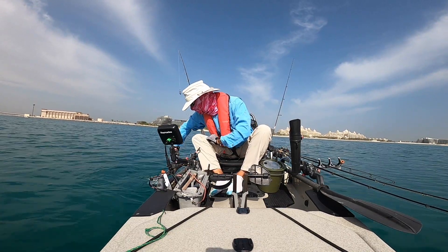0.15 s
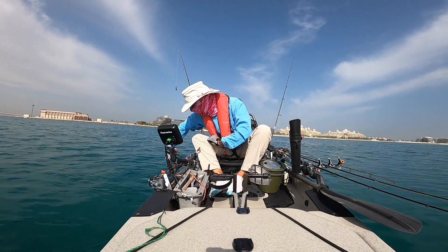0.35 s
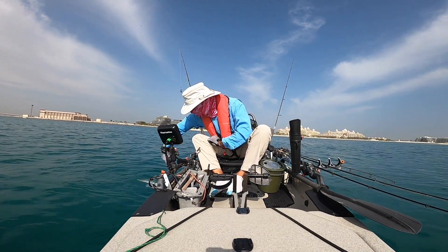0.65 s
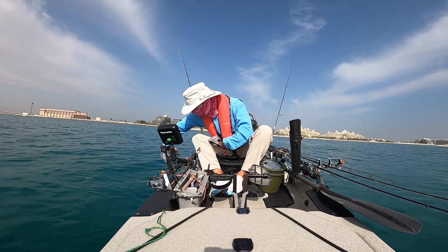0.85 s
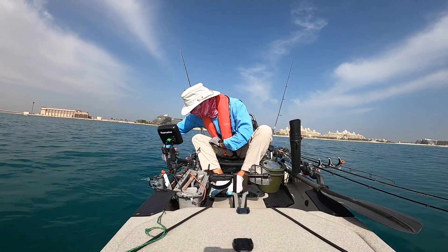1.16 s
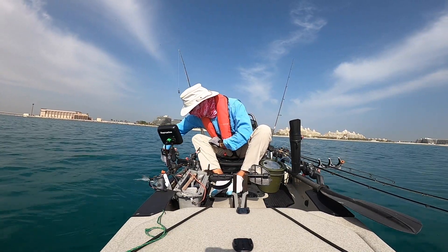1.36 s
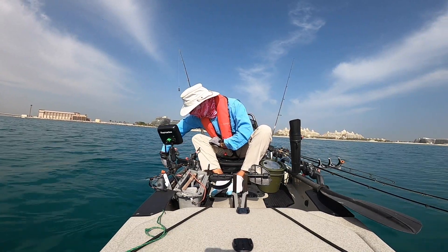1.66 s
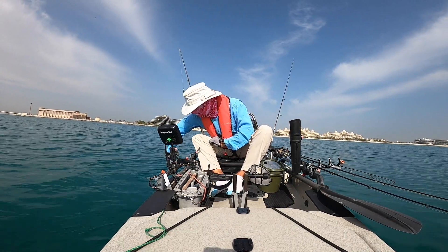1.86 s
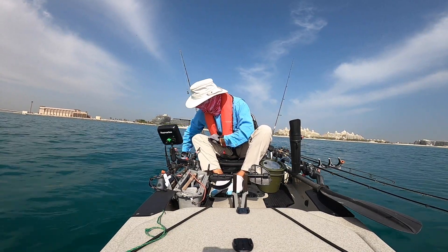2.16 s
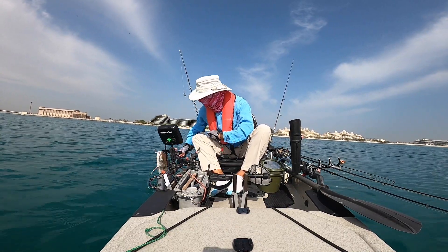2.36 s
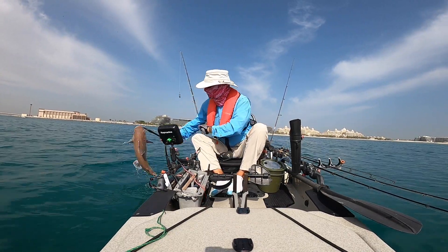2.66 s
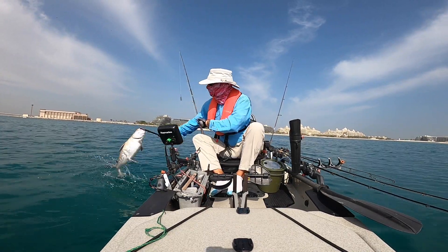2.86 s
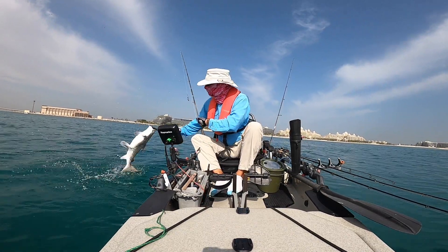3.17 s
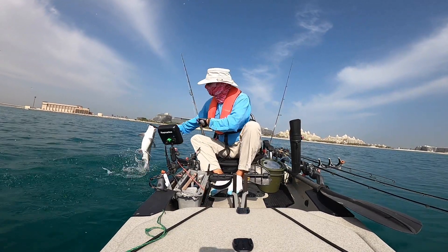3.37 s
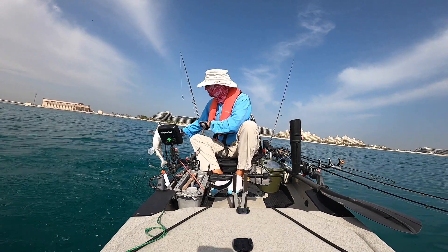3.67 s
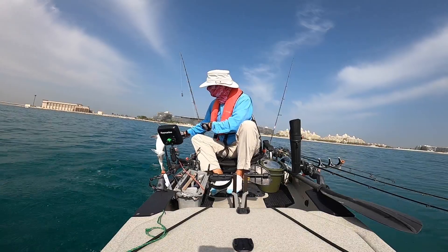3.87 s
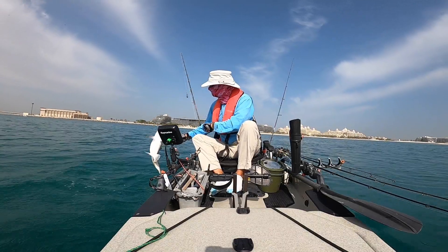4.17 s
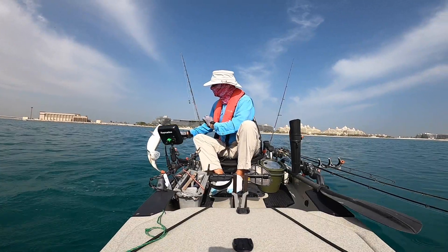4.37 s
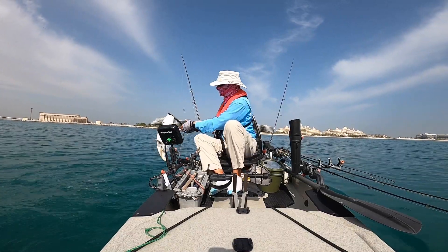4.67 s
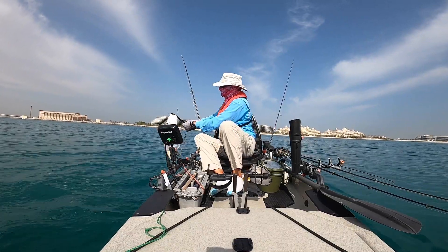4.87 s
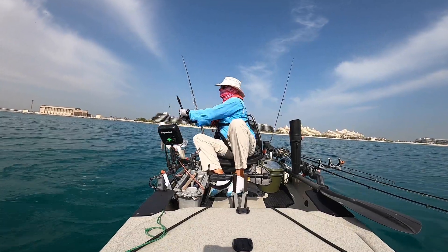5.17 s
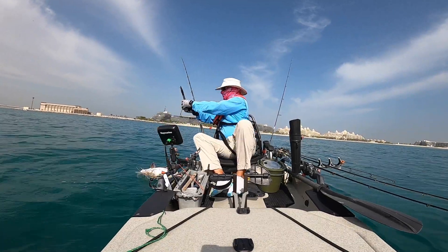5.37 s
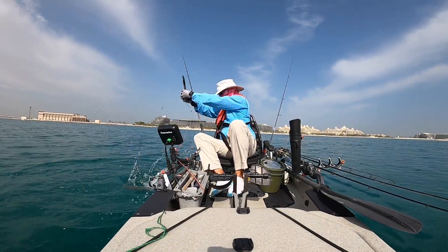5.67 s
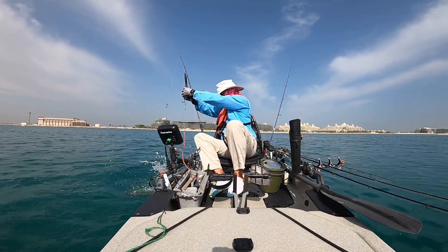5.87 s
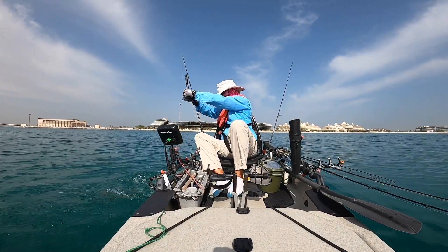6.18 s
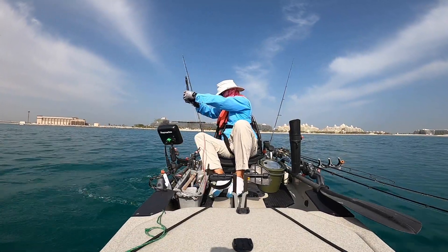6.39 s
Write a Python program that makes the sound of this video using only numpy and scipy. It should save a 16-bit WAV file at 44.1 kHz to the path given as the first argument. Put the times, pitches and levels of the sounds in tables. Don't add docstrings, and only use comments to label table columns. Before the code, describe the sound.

Outdoors on open water, close microphone on a plastic kayak. Low lumpy wind rumble covers a faint steady electric pump hum and distant wash, with a few tiny tackle ticks. A gust thumps the right side, then a fish thrashes with deep gulps, spray and slaps on the hull. Drips thin out into a quiet pause before the fish falls back with a sharp crack, a loud gulp and bubbling.

```python
import sys
import numpy as np
from scipy import signal
from scipy.fft import rfft, irfft, next_fast_len
from scipy.io import wavfile
from scipy.ndimage import uniform_filter1d

SR = 44100
rng = np.random.default_rng(int(sys.argv[2]) if len(sys.argv) > 2 else 0)


def convert_level_to_amplitude(level_db):
    exponent = np.asarray(level_db, float) / 20
    return 10 ** exponent


def persist_wave(psi):
    counts = np.round(np.clip(psi, -1, 1) * 32767).astype(np.int16)
    wavfile.write(sys.argv[1], SR, np.atleast_2d(counts).T)


N = 287867

# start_s, hold_s, release_s (for 20 dB), level_db, fine_spray_db (above level)
THROWS = [(2.267, 0.077, -16.04, -62, -21), (2.385, .08, -1.63, -54, -19), (2.49, .34, -0.73, -48.5, -20),
          (2.858, 0.008, -0.03, -40.5, -7.5), (2.882, 0.0074, 1.32, -52.5, -3),
          (3.007, 0.0131, 0.25, -42.5, -21), (3.084, 0.0067, 0.8069, -40.5, -11),
          (3.272, 0.0047, 0.0921, -38.5, -23.5), (3.326, 0.012, 0.45, -39.5, -9),
          (3.497, 0.051, 0.4377, -46, -29.5), (4.41, .06, .08, -56, -22), (5.245, 0.39, .05, -59, -13.5),
          (5.319, 0.0184, 0.15, -49.5, -17.5), (5.447, .06, 5.42, -63, -21), (5.548, 0.015, 0.1, -41, -12),
          (5.564, 0.075, 0.37, -45.5, -15.5), (5.651, 0.124, 0.08, -38, -16),
          (5.747, 0.0173, 0.1335, -34, -21), (5.801, 0.257, 0.5435, -39, -17.5),
          (6.149, .02, 0.5, -38, -14.5)]
# start_s, hold_s, release_s (for 20 dB), level_db
GURGLES = [
    (2.38, 0.46, 0.03, -46.5),
    (2.885, 0.0041, 0.0365, -37.5),
    (3.035, 0.0057, -0.04, -41),
    (3.095, 0.011, 0.0577, -37),
    (3.3, 0.266, 0.4, -46),
    (4.41, 0.0226, -0.64, -54),
    (5.23, 0.34, 1.6, -54),
    (5.56, .14, 0.14, -43),
    (5.74, 0.024, -0.0058, -27.5),
    (5.8, 0.321, 0.74, -39.5),
]
ATTACK_S = 0.0238
# pitch_hz, level_db (per Hz)
FIZZ_COLOUR = [(3000, 4), (4500, -4), (6000, -10), (8000, -12), (10300, -14), (11500, -28), (12800, -24),
               (15400, -34), (16400, -50)]
# start_s, length_s, hiss_db, body_db
SHEETS = [(2.658, 0.0314, -55, -2), (2.844, 0.0563, -47.5, 6), (3.073, 0.067, -45, 5),
          (3.298, 0.042, -47.5, 0.5), (3.54, 0.019, -56.5, 13), (4.415, 0.045, -67, 8),
          (5.297, 0.07, -52.5, -0.5), (.004, .028, -74, 19), (5.469, .012, -62, 8), (5.515, 0.0284, -53, 9),
          (5.651, 0.0344, -56, 13), (5.726, 0.0377, -53.5, 12.5), (6.135, 0.039, -45.5, -16)]
# start_s, level_db, pitch_hz
AIR_POCKETS = [
    [(2.42, -48, 160.4), (2.476, -44.5, 182.9), (2.518, -17.5, 171.4), (2.68, -56.5, 182.7)],
    [(5.6, -58.5, 171.1), (5.676, -17, 285.8), (5.768, -31, 228), (5.85, -47, 169)],
]
# start_s, level_db, pitch_hz, t60_s
BUBBLES = [(0.115, -45, 499, 0.1), (1.232, -46, 2272, .035), (2.388, -40, 930, 0.05),
           (2.478, -40, 890, .04), (2.508, -38, 620, .07), (2.562, -26, 170, .06), (2.62, -32, 275, .08),
           (2.625, -40, 650, .04), (3.4, -38, 1120, .04), (3.552, -32, 1000, .02), (3.602, -36, 1500, .025),
           (3.747, -40, 1200, .03), (5.663, -31, 420, .04), (5.72, -30, 450, .03), (6.44, -36, 1400, .025),
           (2.499, -27, 328, 0.0243), (2.7, -32, 280, 0.04), (2.826, -27.5, 341, 0.0247),
           (3.033, -21.5, 1249, 0.0488), (3.295, -34.5, 1239, 0.0435), (3.83, -38, 1100, 0.03),
           (5.235, -38, 713.6, 0.07), (5.437, -28, 330, 0.02), (5.5325, -11, 400, 0.015),
           (5.533, -13, 270, .02), (2.582, -36, 1190, .03), (2.6615, -37, 1030, .03),
           (2.698, -38, 1010, .03), (2.338, -46, 2250, .02), (2.38, -44, 2300, .03),
           (4.435, -45, 2300, .02), (4.448, -45, 1600, .02), (5.992, -31, 996, .03),
           (5.744, -18, 295, 0.0574), (5.855, -34.5, 794, 0.046), (5.914, -26, 729, 0.0243),
           (6.001, -30.5, 583.2, 0.068), (6.019, -29.5, 708.6, 0.0596), (6.189, -36, 1004, 0.039),
           (6.313, -36, 546, 0.09), (6.408, -32.5, 1250, 0.0384)]
# start_s, level_db, pitch_hz
SMALL_DROPS = [(2.36, -37.5, 2257), (2.4494, -40.5, 1650), (2.5037, -31, 2376), (2.577, -38.5, 1920),
               (2.661, -38.5, 2250), (2.71, -35.5, 1970), (2.8578, -17, 1900), (2.913, -35, 2420),
               (3.0054, -31.5, 1814), (3.018, -26.5, 2285), (3.097, -23, 2425), (3.1218, -18, 2022),
               (3.2035, -39, 1880), (3.2522, -33, 1870), (3.281, -22, 2170), (3.3811, -30.5, 2630),
               (3.486, -29.5, 3000), (3.539, -26, 1884), (3.5555, -26, 2360), (3.6099, -29.5, 2297),
               (3.6243, -32, 2490), (3.6554, -30, 2690), (3.683, -32, 2643),
               (3.963, -39.5, 3165), (4.1461, -43.5, 3320), (4.4076, -34.5, 3243),
               (5.5328, -17, 2552), (5.6303, -29, 2786), (5.6552, -23.5, 2588), (5.6728, -25, 3465),
              (5.6935, -25, 1506), (5.7406, -14.5, 2012), (5.76, -18, 2787), (5.89, -30.5, 2330),
              (6.0235, -28.5, 2606), (6.0661, -29.5, 2150), (6.168, -26, 1765), (6.18, -26, 2635),
              (6.2364, -22.5, 2360), (6.3494, -34, 2140), (6.489, -41, 2286)]
DROP_T60_S = 0.01225
# start_s, level_db, body_db (above level)
SLAPS = [(0.116, -34, 11), (2.598, -26, 12.5), (2.848, -25.5, 4.5), (2.8772, -22.5, -11),
         (3.019, -26.5, 4.5), (3.0747, -27.5, -6.5), (3.1021, -18, 10.5), (3.2971, -23.5, -10),
         (3.3187, -16.5, -11.5), (3.653, -29, 4), (3.7271, -28.5, 10.5), (4.0369, -36, -9.5),
         (4.075, -37, 4.5), (4.408, -38.5, 14), (4.4765, -38, 14), (5.2357, -42, 8), (5.5241, -30, 13),
         (5.533, -13, 2), (6.153, -25.5, -6.5), (6.314, -28, -6), (6.418, -29, 5), (6.4345, -28, 0)]
# start_s, level_db, body_db (above level)
TICKS = [(0.2971, -50, 10), (0.6045, -57, 18), (0.7178, -52, 6), (1.088, -55, 8), (1.1724, -54, 9),
         (1.5948, -58, 18), (1.9215, -51, 6), (2.2844, -50, 10), (4.557, -45, 9), (4.7694, -43, 10)]
SNAP_S, SNAP_DB = 5.5246, -10
# start_s, length_s, level_db, top_hz
KNOCKS = [(2.378, .02, -47, 1300), (3.432, .006, -45, 2500), (3.465, .012, -42, 1400),
          (5.231, .009, -41, 3000), (5.433, .011, -38, 800), (5.5255, .006, -32, 2800),
          (5.531, .005, -18.5, 2900), (5.537, .005, -38, 3000), (5.738, .008, -29, 2300),
          (5.755, .008, -32, 1800), (6.24, .006, -38, 3000)]
# start_s, level_db, pitch_hz
SPECKS = [(0.0094, -33, 3920), (0.0174, -42, 3740), (0.1156, -33, 3330), (0.4683, -59, 4510),
          (2.355, -49, 3200), (2.4254, -48, 3800), (2.5032, -35, 3320), (2.5601, -45, 3740),
          (2.578, -32, 3950), (2.6339, -40, 3930), (2.6539, -39, 3300), (2.7018, -41, 3350),
          (2.7536, -46, 3370), (2.8659, -26, 4140), (2.8744, -21, 4670), (2.9407, -46, 6230),
          (2.9662, -44, 4420), (3.032, -34, 3220), (3.0854, -25, 3260), (3.1872, -41, 3200),
          (3.2031, -34, 3990), (3.3474, -33, 3200), (3.3662, -33, 3300), (3.4106, -31, 3700),
          (3.4341, -36, 4430), (3.458, -37, 3240), (3.485, -34, 3200), (3.5109, -39, 3350),
          (3.5508, -30, 3610), (3.6052, -38, 3570), (3.6334, -38, 3220), (3.682, -33, 3290),
          (3.7708, -42, 3420), (3.8127, -47, 3260), (3.8631, -47, 4200), (3.8846, -46, 3750),
          (3.937, -49, 3360), (4.0154, -45, 4440), (4.0951, -50, 3200), (5.659, -26, 3450),
          (5.8661, -34, 4480), (5.888, -31, 3420), (6.0137, -31, 3240), (6.0691, -35, 3320),
          (6.1275, -33, 3370), (6.1509, -24, 4710), (6.1674, -28, 3210), (6.2387, -28, 3380),
          (6.2996, -32, 3200), (6.349, -36, 3430), (6.3894, -40, 3330)]
SPECK_DB, SPECK_T60_S, SPECK_WIDTH = -3, .018, 1.16
# start_s, turns_per_s
SHAFT = [(0, 43.43), (2.3, 43.43), (4.2, 43.48), (6.53, 43.48)]
# pitch_hz, level_db
HUM_COLOUR = [(350, -4), (1000, -6), (1550, -9), (1750, -18), (2300, -13), (3000, -19), (3500, -24),
              (3750, -29), (4400, -28), (4800, -29), (5200, -37)]
HUM_DB = -67
# pitch_hz, level_db
ORDERS_HEARD = [(565.2, -66), (651.4, -69), (780.6, -73), (1087, -72), (1303, -75), (1610, -78),
                (1653, -79), (2040, -75), (2083, -76), (2390, -82), (2433, -81), (2606, -81), (2735, -82),
                (3386, -88), (3429, -85), (4040, -93), (4430, -88), (4473, -92), (4689, -89), (694.4, -66),
                (737.5, -67), (866.7, -71), (952.8, -68), (1044, -73), (1130, -66), (1174, -65),
                (1217, -67), (1260, -73), (1432, -70), (1911, -75), (1954, -74), (1997, -73), (2169, -74),
                (2261, -76), (4517, -83), (4560, -81)]
# shaft_multiple, level_db
LATE_ORDERS = [(55, -80), (102, -79)]
LATE_S, LATE_RUMBLE_DB = 2.5, 3.5
# start_s, level_db
WIND = [(0.0, -29.5), (0.49, -31), (1.02, -31.5), (1.44, -30.5), (1.91, -26.5), (2.05, -28.5), (2.11, -23),
        (2.24, -30.5), (2.47, -27.5), (2.62, -26.5), (2.74, -43.5), (3.14, -36), (4.75, -36), (4.85, -32),
        (4.93, -37.5), (5.5, -33), (5.74, -35), (6.53, -35)]
# pitch_hz, level_db (per Hz)
RUMBLE_COLOUR = [(8.8, -29), (15, -3), (43, -5), (63, -2), (162, -12.5), (210, -11), (295, -20), (324, -27),
                 (427, -30), (462, -31.5), (600, -35.5), (780, -68), (1320, -120)]
# pitch_hz, level_db
UPPER_COLOUR = [(90, -7.5), (150, 3.0), (230, -3.5), (300, -9.0), (450, -20.5), (800, -38), (1600, -120)]
UPPER_DB, UPPER_FOLLOW, CALM_DB = -45, 0.13, -34.5
# start_s, left_over_right_db
LEAN = [(0.0, -2.5), (0.28, -9), (0.37, 0), (1.65, -0.5), (1.771, -13), (2.149, -6), (2.35, -5.5),
        (2.7, -18.5)]
# start_s, hold_s, release_s (for 20 dB), level_db
GUSTS = [
    (1.62, 0.163, 2.88, -50),
    (1.82, 0.022, 0.02, -37),
    (1.965, 0.0061, -0.234, -26.5),
    (2.055, 0.0302, 0.131, -19),
    (2.13, 0.1015, .03, -24),
]
# pitch_hz, level_db (per Hz)
GUST_COLOUR = [(35, -36.5), (60, -1), (81, 5.5), (271, -5.5), (308, -17), (404, -15), (828, -46),
               (1000, -36.5), (1300, -76.5), (2200, -120)]
# start_s, level_db, pitch_hz
BUFFETS = [(1.758, -21.5, 123.3), (1.839, -24, 156), (1.966, -16, 154.2), (2.054, -26.5, 250.3),
           (2.06, -40, 380), (2.147, -39, 340), (2.17, -44, 400), (2.219, -23, 125.1)]
# pitch_hz, likeness (0-1)
SAME = [(60, 0.695), (150, 1), (380, 0.95), (950, 0.7), (2380, 1), (5980, 0.21), (15000, 0.32)]
# pitch_hz, level_db (per Hz)
SEA_COLOUR = [(180, -19), (300, 1), (490, -4.5), (730, -2), (810, -13), (1170, -9), (1750, -22),
              (2000, -15.5), (3760, -33), (4600, -31), (5100, -36), (8800, -40), (11000, -47), (16000, -79)]
SEA_DB = -55
MIST_DB, MIST_S, DRIP_S, DRIP_DB, EARLIER_DB, EARLIER_S = -11, 0.084, 2.5, -67, -58, 0.25
# start_s, width (0-1)
WIDTH = [
    (0, 0.36),
    (2.3, 0.95),
    (2.45, 0.14),
    (2.75, 0.01),
    (5.9, 0.01),
    (6.2, 0.07),
    (6.53, 0.12),
]


def evened(x):
    return x / np.sqrt(np.mean(x ** 2) + 1e-20)


def read(points, hz):
    f, value = np.transpose(points)
    return np.interp(np.log(hz + 1), np.log(f + 1), value)


def add(mix, s, sound):
    part = mix[max(round(s * SR), 0):][:len(sound)]
    part += sound[:len(part)]


def band(x, lo_hz, hi_hz, order=2):
    return signal.sosfilt(signal.butter(order, [lo_hz, hi_hz], "band", fs=SR, output="sos"), x)


def coloured(x, points):
    size = next_fast_len(N)
    gain = convert_level_to_amplitude(read(points, np.fft.rfftfreq(size, 1 / SR)))
    return irfft(rfft(x, size) * gain, size)[..., :N]


def lumps(seconds):
    size = max(int(seconds * SR), 1)
    return evened(uniform_filter1d(uniform_filter1d(rng.standard_normal(N), size), size))


def pair(points, same):
    size = next_fast_len(N)
    hz = np.fft.rfftfreq(size, 1 / SR)
    a, b = rfft(rng.standard_normal((2, size))) * convert_level_to_amplitude(read(points, hz))
    c = np.clip(same(hz), 0, 1)
    return evened(irfft(np.array([a, c * a + np.sqrt(1 - c ** 2) * b]), size)[:, :N])


def amp_of(rows):
    rows, t = np.array(rows), np.arange(N) / SR
    fade = np.clip(np.minimum(t - rows[0, 0] + .02, rows[-1, 0] + .02 - t) / .02, 0, 1)
    return convert_level_to_amplitude(np.interp(t, rows[:, 0], rows[:, 1])) * fade


def surges(rows, extra_db=0):
    start, hold, release, db = np.transpose(rows)[:4, :, None]
    t = np.arange(0, N / SR + .001, .001)
    rise = np.maximum(start - t, 0) / ATTACK_S
    fall = np.maximum(t - start - abs(hold), 0) / abs(release)
    power = (convert_level_to_amplitude(db + extra_db - 20 * np.minimum(rise + fall, 10)) ** 2).sum(0)
    return np.interp(np.arange(N) / SR, t, np.sqrt(power))


def grains(per_s, lo_hz, hi_hz, cycles, spread_db, count=24):
    when, kind, strength = rng.random((3, N))
    at = np.flatnonzero(when < per_s / SR)
    out = np.zeros(N)
    for k, hz in enumerate(np.geomspace(lo_hz, hi_hz, count)):
        u = np.arange(int(3 * cycles / hz * SR) + 4) / SR * hz
        ring = np.sin(2 * np.pi * u * (1 + 0.0656 * u / cycles))
        shape = ring * np.exp(-2 * u / cycles) * (1 - np.exp(-u / 0.57))
        for i in at[(kind[at] * count).astype(int) == k]:
            gain = convert_level_to_amplitude(spread_db * min(-np.log(strength[i] + 1e-9), 4))
            add(out, i / SR, gain * shape / np.sqrt(len(u)))
    return evened(out)


def hiss():
    landings = convert_level_to_amplitude(5 * np.minimum(rng.exponential(1, N), 3)) * (rng.random(N) < 60 / SR)
    crackle = .8 + evened(signal.lfilter([1], [1, -np.exp(-1 / (.0018 * SR))], landings))
    clumped = crackle * convert_level_to_amplitude(2 * lumps(0.012)) * rng.standard_normal((2, N))
    fine = evened(band(coloured(clumped[0], FIZZ_COLOUR), 4760, 17000))
    return fine, evened(band(clumped[1], 870, 2930))


def splash():
    fine, body = hiss()
    fizz = 0.665 * grains(1200, 1100, 3735, 13.0, 4) + 0.36 * grains(600, 1867, 6040, 14, 3.72) + .38 * body
    ticks = evened(band(coloured(grains(400, 5040, 11840, 6.5, 3.0), FIZZ_COLOUR), 4200, 15500))
    churn = evened(band(rng.standard_normal(N), 420, 1695))
    gurgle = 0.77 * grains(350, 419.45, 1419.2, 10.08, 3.85) + 0.29 * churn
    out = convert_level_to_amplitude(-3.0) * surges(THROWS) * evened(fizz)
    out += convert_level_to_amplitude(-1.0) * surges(GURGLES) * evened(gurgle)
    out += surges(THROWS, np.array(THROWS)[:, 4:]) * evened(.3 * ticks + 1.78 * fine)

    sheet_hiss = evened(band(coloured(rng.standard_normal(N), FIZZ_COLOUR), 4450, 13900))
    even = evened(0.22 * fine + sheet_hiss)
    lower = evened(0.22 * body + evened(band(rng.standard_normal(N), 1600, 3910)))
    for s, seconds, db, body_db in SHEETS:
        at = slice(round(s * SR), round((s + seconds) * SR))
        sheet = even[at] + convert_level_to_amplitude(body_db) * lower[at]
        add(out, s, convert_level_to_amplitude(db) * sheet * signal.windows.tukey(len(sheet), .3))
    return out


def plunge():
    out = np.zeros(N)
    for rows in AIR_POCKETS:
        s, _, hz = np.transpose(rows)
        phase = 2 * np.pi * np.cumsum(np.interp(np.arange(N) / SR, s, hz)) / SR
        wobble = lumps(0.0068) * np.cos(phase) + lumps(0.00241) * np.sin(phase)
        overtone = 0.35 * lumps(0.0077) * np.sin(1.6 * phase)
        out += convert_level_to_amplitude(-5.5) * amp_of(rows) * evened(wobble + 1.12 * np.sin(phase) + overtone)
    return out


def drops():
    out, t = np.zeros(N), np.arange(3000) / SR
    rings = BUBBLES + [(*row, DROP_T60_S) for row in SMALL_DROPS]
    chance = rng.random((len(rings), 2))
    for (s, db, hz, t60), (ratio, late) in zip(rings, chance):
        u = t / max(t60, .003)
        neighbour = (s + 0.004128 * late, hz * (0.745 + 0.6623 * ratio), -9)
        for start, pitch, drop_db in ((s, hz, 3), neighbour):
            ring = np.sin(2 * np.pi * pitch * t * (1 + 0.018 * u))
            add(out, start, convert_level_to_amplitude(db + drop_db - 60 * u) * ring * (1 - np.exp(-t / 0.000466)))
    return out


def slaps():
    out, t = np.zeros(N), np.arange(3000) / SR
    add(out, SNAP_S, convert_level_to_amplitude(SNAP_DB) * np.diff(np.exp(-(t * SR / 2.1 - 4) ** 2)) * 2)
    noise = rng.standard_normal((len(SLAPS + TICKS), 2, 3000))
    for (s, db, body_db), (a, b) in zip(SLAPS + TICKS, noise):
        crack = evened(band(a, 3000, 10500, order=3)) * convert_level_to_amplitude(-60 * t / .011)
        body = convert_level_to_amplitude(body_db + 2 - 60 * t / 0.009) * evened(band(b, 1600, 4200))
        add(out, s, convert_level_to_amplitude(db - 15) * (crack + body))
    return out


def hull():
    out, t = np.zeros(N), np.arange(1200) / SR
    noise = rng.standard_normal((len(KNOCKS + SPECKS), len(t)))
    for (s, seconds, db, top_hz), puff in zip(KNOCKS, noise):
        size = min(round(seconds * SR), len(t))
        add(out, s, convert_level_to_amplitude(db) * evened(band(puff, 220, top_hz, order=4)[-size:] * np.hanning(size)))
    for (s, db, hz), puff in zip(SPECKS, noise[len(KNOCKS):]):
        tick = evened(band(puff, hz / SPECK_WIDTH, hz * SPECK_WIDTH)) * (1 - np.exp(-t / .0008))
        add(out, s, convert_level_to_amplitude(db + SPECK_DB - 60 * t / SPECK_T60_S) * tick)
    return out


def pump():
    s, speed = np.transpose(SHAFT)
    t = np.arange(N) / SR
    turns = np.cumsum(np.interp(t, s, speed)) / SR
    k = np.arange(8, 118)
    db = HUM_DB + read(HUM_COLOUR, k * speed[0]) + 0.28 * rng.standard_normal(len(k))
    for hz, line_db in ORDERS_HEARD:
        db[round(hz / speed[0]) - k[0]] = line_db + 4.5 * (hz > 4000)
    phase = 2 * np.pi * k * (.27 + .0004 * k) + .9 * rng.standard_normal(len(k))
    wheel = np.linspace(0, 1, 4096)
    one_turn = np.sqrt(2) * convert_level_to_amplitude(db) @ np.cos(2 * np.pi * k[:, None] * wheel - phase[:, None])
    hum = np.interp(turns % 1, wheel, one_turn) * convert_level_to_amplitude(.7 * lumps(0.032))
    for order, order_db in LATE_ORDERS:
        hum += (t > LATE_S) * np.sqrt(2) * convert_level_to_amplitude(order_db) * np.cos(2 * np.pi * order * turns)
    return np.array([convert_level_to_amplitude(-2.5) * hum, np.roll(hum, 2)])


def wind():
    t = np.arange(N) / SR
    lumpy = convert_level_to_amplitude(np.array([3.55 * lumps(0.018), 1.1 * lumps(.02)]))
    rumble = pair(RUMBLE_COLOUR, lambda hz: read(SAME, hz) - .45) * lumpy
    lean = np.interp(t, *np.transpose(LEAN))
    force = amp_of(WIND)
    low = evened(band(rumble, 5.6, 132.6)) * convert_level_to_amplitude(np.array([lean, -lean]) / 2) * force
    upper = pair(UPPER_COLOUR, lambda hz: read(SAME, hz)) * convert_level_to_amplitude(2.35 * lumps(0.012))
    upper_gain = convert_level_to_amplitude(UPPER_DB + LATE_RUMBLE_DB * (t > LATE_S)) * (force / convert_level_to_amplitude(CALM_DB)) ** UPPER_FOLLOW
    return low + upper_gain * upper


def gust():
    rough = coloured(rng.standard_normal(N), GUST_COLOUR) * convert_level_to_amplitude(3.2 * lumps(.008))
    right = convert_level_to_amplitude(3) * surges(GUSTS) * evened(rough)
    t = np.arange(2000) / SR
    sag = 1 + 1.11 * np.exp(-t / 0.0055)
    shape = np.exp(-t / 0.01075) * (1 - np.exp(-t / 0.00153)) ** 2
    for s, db, hz in BUFFETS:
        add(right, s, convert_level_to_amplitude(db + 8) * np.sin(2 * np.pi * hz * np.cumsum(sag) / SR) * shape)
    return np.array([np.zeros(N), right])


def sea():
    wash = convert_level_to_amplitude(SEA_DB + 1.2 * lumps(0.047)) * pair(SEA_COLOUR, lambda hz: read(SAME, hz))
    t, keep = np.arange(N) / SR, np.exp(-1 / (MIST_S * SR))
    mist = convert_level_to_amplitude(MIST_DB) * signal.lfilter([1 - keep], [1, -keep], surges(THROWS))
    swell = mist + convert_level_to_amplitude(DRIP_DB) * (t > DRIP_S) + convert_level_to_amplitude(EARLIER_DB - 20 * t / EARLIER_S)
    return wash + convert_level_to_amplitude(-13.5) * swell * evened(band(rng.standard_normal(N), 2700, 9660))


def scene():
    water = splash() + plunge() + drops() + slaps() + hull()
    side = convert_level_to_amplitude(-5.5) * np.roll(water, 40)
    return np.array([water + side, water - side]) + pump() + wind() + gust() + sea()


def top_cut(x):
    return signal.sosfilt(signal.butter(12, 16510, fs=SR, output="sos"), x)


def record(dry):
    s, width = np.transpose(WIDTH)
    width = np.clip(np.interp(np.arange(N) / SR, s, width), 0, 1)
    mid, side = (dry[0] + dry[1]) / 2, (dry[0] - dry[1]) / 2
    top_filter = signal.firwin(255, [11500, 15800], pass_zero=False, fs=SR)
    top = signal.oaconvolve(mid, top_filter, "same")
    deep = signal.filtfilt(*signal.butter(2, 55, fs=SR), mid)
    mid = mid - (1 - width) * 0.35 * deep
    side = width * side - (1 - width) * top * (0.34 + 0.6 * lumps(0.00022))
    low_pass = signal.firwin(255, 15900, fs=SR)[None]
    mix = signal.oaconvolve(np.array([mid + side, mid - side]), low_pass, "same", axes=1)
    return top_cut(mix)


dry = scene()
out = record(dry)
persist_wave(out)
```